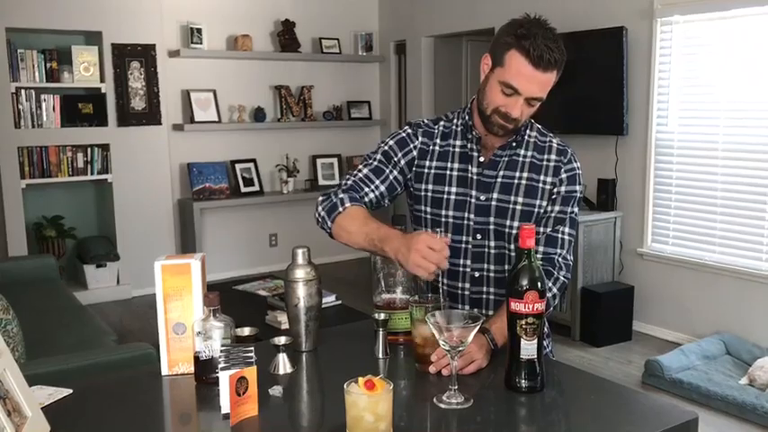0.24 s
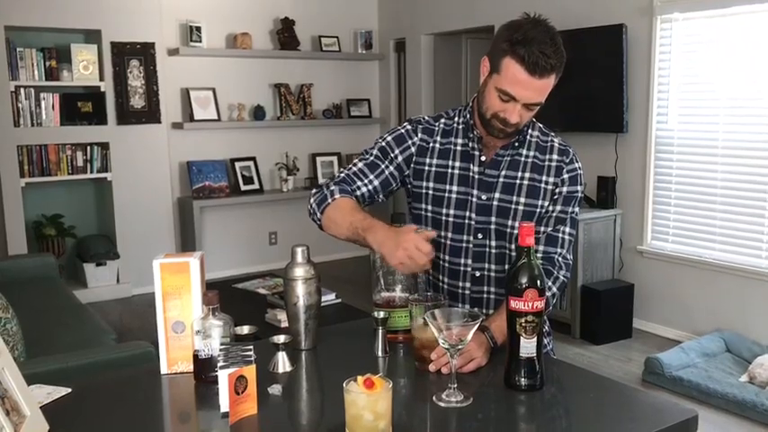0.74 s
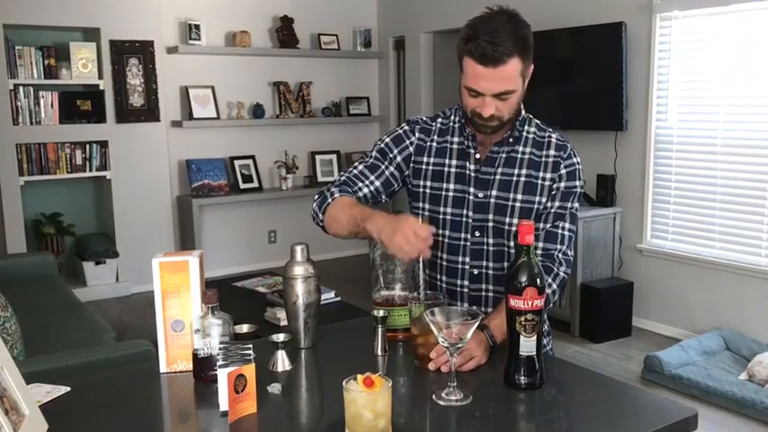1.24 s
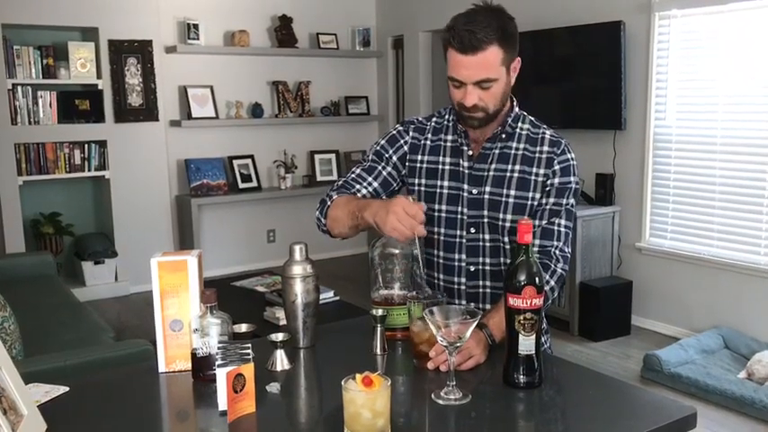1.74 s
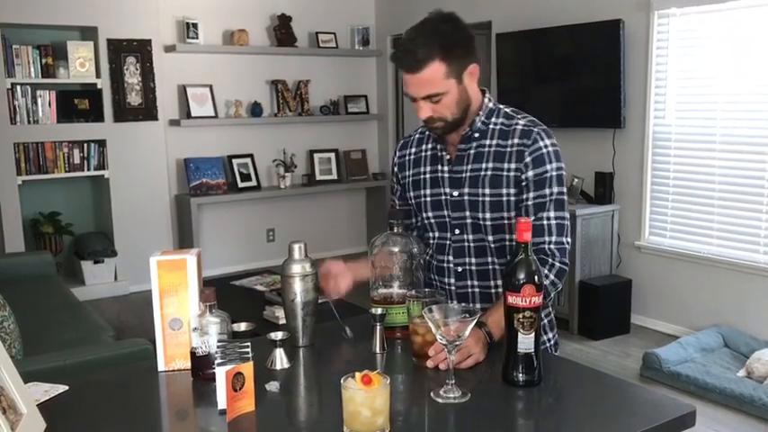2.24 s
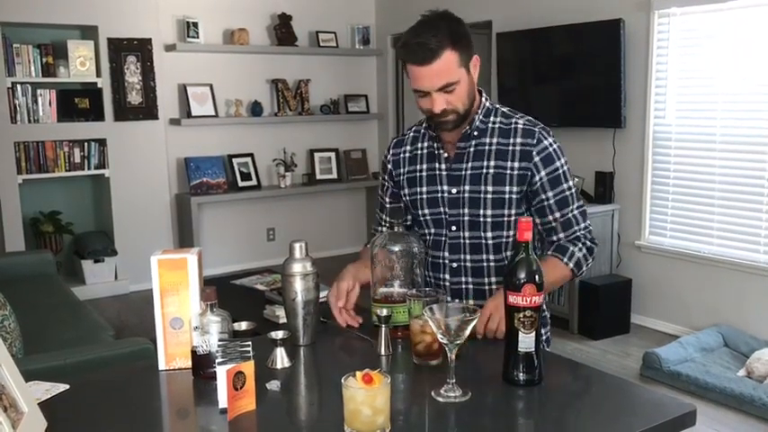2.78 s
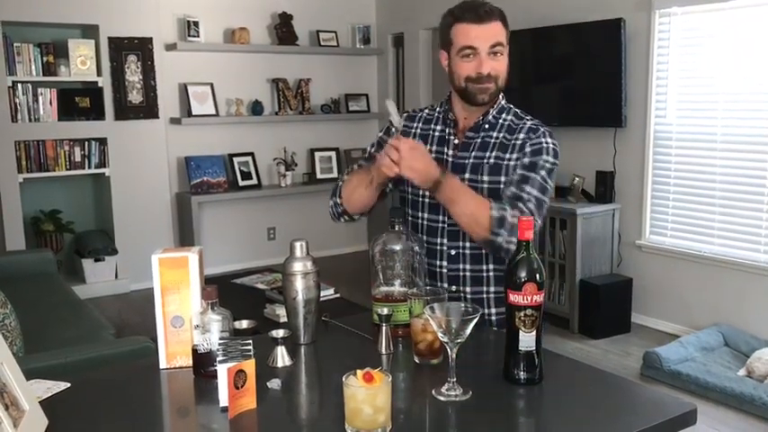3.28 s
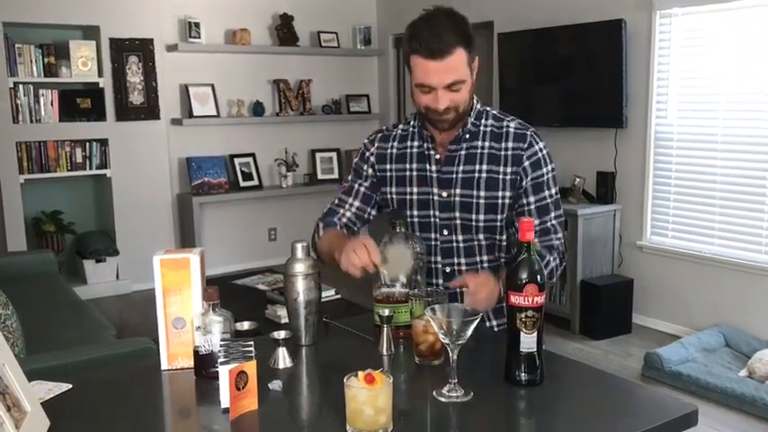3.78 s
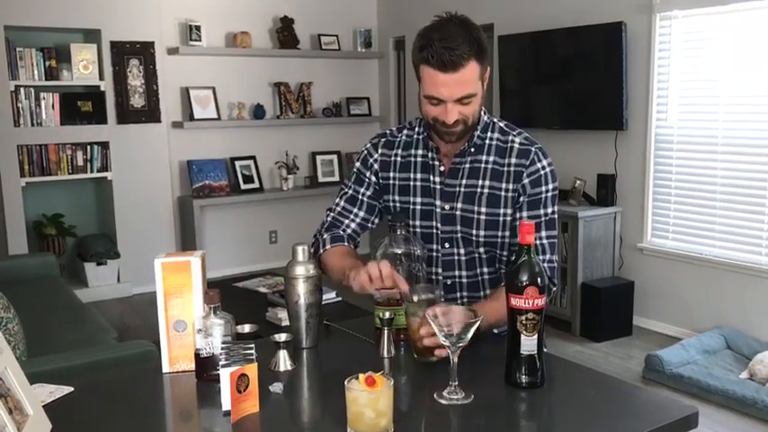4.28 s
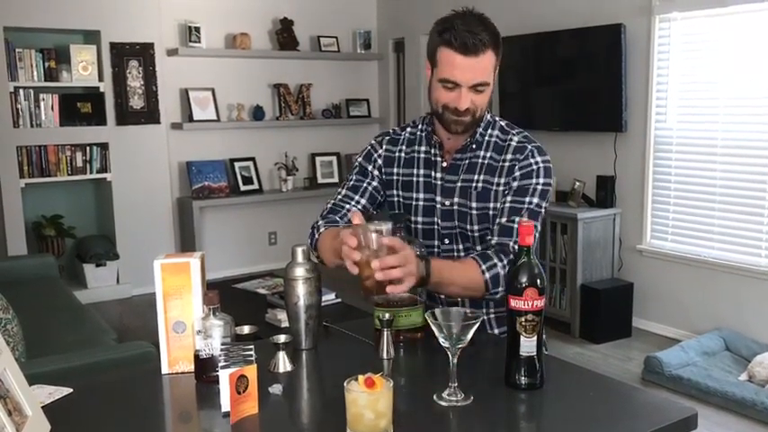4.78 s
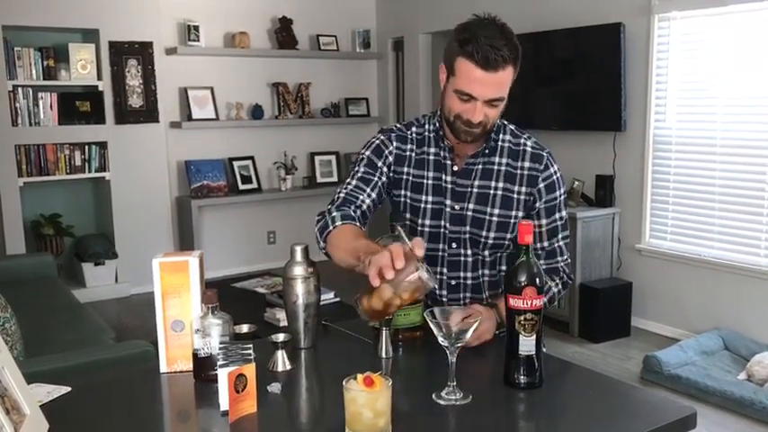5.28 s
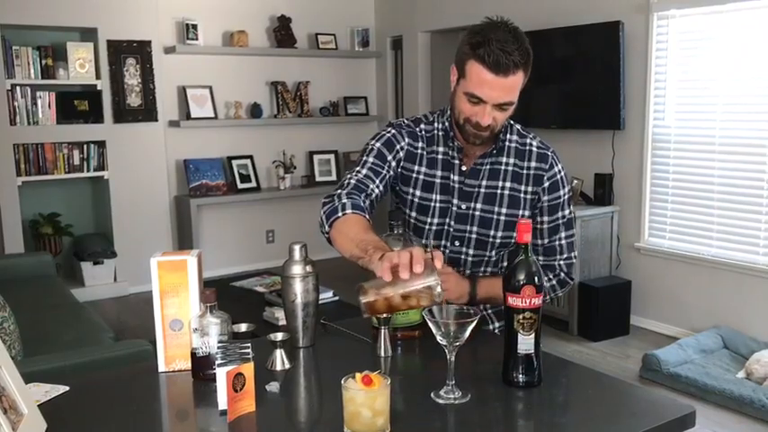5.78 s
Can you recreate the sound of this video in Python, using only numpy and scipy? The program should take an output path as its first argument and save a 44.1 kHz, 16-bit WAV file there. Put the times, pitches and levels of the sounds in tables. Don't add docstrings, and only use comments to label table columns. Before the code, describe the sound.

A metal bar spoon stirs ice in a wet mixing glass with dense, uneven clinks, then taps the rim with one loud ring. The spoon drops on a stone counter, ringing and bouncing to rest. After a pause, a thin metal strainer is lifted, then rattles onto the glass. Ice knocks faintly as it tips, and a soft pour starts. Lively living room, low ventilation hum, one microphone.

```python
import sys
import numpy as np
from scipy import signal
from scipy.fft import rfft, irfft
from scipy.io import wavfile
from scipy.ndimage import uniform_filter1d

SR = 44100
rng = np.random.default_rng(int(sys.argv[2]) if len(sys.argv) > 2 else 0)


def convert_level_to_amplitude(level_db):
    exponent = np.asarray(level_db, float) / 20
    return 10 ** exponent


def file_out(sig):
    cols = np.atleast_2d(sig).T
    lim = np.clip(cols, -1, 1)
    pcm = np.round(lim * 32767).astype(np.int16)
    wavfile.write(sys.argv[1], SR, pcm)


N = 265482
TIME_S = np.arange(N) / SR


def stirring():
    # start_s, strength_db, hardness_db_per_octave
    stir_blows = [(0.003, -25.5, 6.5), (0.0131, -30, 0.5), (0.1606, -52.5, -6.5), (0.2458, -37.5, 0),
                  (0.2563, -46, 5), (0.2902, -59, 2), (0.3066, -35, 2.5), (0.388, -40.5, -1.5),
                  (0.4685, -47, -6), (0.5092, -39, -0.5), (0.5706, -45.5, 4), (0.5748, -38.5, -3.5),
                  (0.5892, -44, -3), (0.604, -48.5, -7.5), (0.6545, -44.5, 0.5), (0.6585, -23.5, 2),
                  (0.664, -39.5, 1), (0.6715, -25, 0.5), (0.6785, -45.5, -2.5), (0.693, -34.5, -3),
                  (0.7038, -38, 5), (0.8106, -34.5, -0.5), (0.8529, -45.5, -1), (0.8794, -34.5, -1.5),
                  (0.9497, -46, 10), (1.0071, -39.5, 1), (1.0112, -31, 2.5), (1.0287, -37.5, -4),
                  (1.0548, -35.5, -1), (1.061, -40, 1.5), (1.1095, -44, 1), (1.1558, -44, 1),
                  (1.2369, -40, -4), (1.256, -52, -2.5), (1.3153, -46, -5.5), (1.3594, -45.5, -4)]
    # pitch_hz, level_db, t60_s
    stirred_modes = [(290, -21.5, 0.098), (616, -32, 0.032), (1141, -10.5, 0.035), (1850, -12, 0.079),
                     (3090, 0.5, 0.012), (4412, -3, 0.075), (4323, -5, 0.055), (2450, -8.5, 0.033),
                     (5200, -14, 0.012), (6250, -4.5, 0.053), (8400, -13.5, 0.073), (12150, -16, .06)]
    # start_s, level_db
    stem_pings = [
        (0.0134, -46),
        (0.3072, -49.5),
        (0.7043, -56),
        (0.8794, -39.5),
        (1.064, -42),
        (1.1587, -50.5),
        (1.291, -63),
    ]
    # start_s, level_db
    wall_pings = [(0.0044, -27.5), (0.164, -37.5), (0.3074, -38), (0.396, -34.5), (0.5103, -49),
                  (0.606, -42), (0.7032, -52.5), (0.8121, -36.5), (0.8822, -41.5), (0.9503, -42.5),
                  (1.0114, -37), (1.1078, -37), (1.2365, -52), (1.3613, -56), (1.4152, -57)]
    # start_s, contacts_per_s, level_db
    swirl = [
        (0.0, 76, -41.5),
        (0.32, 51, -50),
        (0.6, 270, -54),
        (0.784, 103, -49),
        (0.972, 270, -50),
        (1.336, 160, -61.5),
        (1.5, 170, -67),
    ]
    out = blows(stir_blows, "stirred", stirred_modes, damp=0.54, ring_db=-24,
                crack_db=-7.5, crack_s=0.0036, spread_db=2)
    out += pings(stem_pings, 6390, level_db=7, t60=0.067)
    out += pings(wall_pings, 1838, level_db=-1, t60=0.06)
    return out + convert_level_to_amplitude(-9) * ice(swirl, stirred_modes, damp=0.56, tick_db=3, uneven_db=4)


def rim_tap():
    # start_s, strength_db, hardness_db_per_octave
    tap = [
        (1.5085, -12, 0.23),
    ]
    glass_hz = (275, 520, 660, 870, 1180, 1832, 1847, 4180, 4441, 4515, 4690, 6390, 7797, 7845, 7932, 12130,
                12190, 14840)
    # level_db, t60_s
    glass_modes = [(-40.5, 0.32), (-28.5, 0.035), (-26.5, 0.015), (-35, 0.055), (-17.5, .02), (-22.5, 0.1),
                   (-21, 0.2), (-20.5, 0.09), (-13.5, 0.22), (-5.5, 0.025), (-24.5, .02), (-29.5, 0.18),
                   (-19.5, 0.054), (-23.5, 0.22), (-19, 0.12), (-25.5, 0.1), (-28, 0.05), (-27, .1)]
    return blows(tap, "rim", np.c_[glass_hz, glass_modes], damp=0.69, ring_db=-2.5,
                 crack_db=-13, crack_s=0.0055, spread_db=1)


def spoon_held():
    # start_s, strength_db, hardness_db_per_octave
    touches = [
        (2.367, -33.5, 0.09),
        (2.4324, -38, 0.79),
    ]
    held_hz = (1300, 2250, 6390, 6780, 8960, 10640, 12950, 14890)
    # level_db, t60_s
    held_modes = [(-1.5, 0.014), (-6.5, 0.092), (-6.5, 0.27), (-21.5, .05), (-6.5, .04), (-3.5, 0.051),
                  (-1.5, .04), (2, .1)]
    return blows(touches, "held", np.c_[held_hz, held_modes], damp=0.33, ring_db=-26.5,
                 crack_db=-8.5, crack_s=0.022, spread_db=2)


def spoon_rocking():
    # start_s, strength_db, hardness_db_per_octave
    bowl_blows = [
        (2.5352, -16.5, 1),
        (2.5395, -27, 0),
        (2.544, -26.5, -1),
        (2.5744, -26.5, -0.5),
        (2.6748, -29.5, -2.5),
        (2.7472, -27.5, 0.5),
    ]
    rocking_hz = (275, 520, 610, 700, 2234, 4960, 6390, 7714, 7790, 8880, 10820, 11360, 12190, 14400, 15060,
                  15480)
    # level_db, t60_s
    rocking_modes = [(-12, 0.29), (-16.5, 0.015), (7, 0.048), (-18, 0.42), (-6, 0.982), (-2.5, 2.0),
                     (2, 0.66), (-1, 0.18), (-0.5, 1.2), (9, 0.029), (-19, 0.24), (-2, 0.3), (-15.5, 0.16),
                     (-12, .15), (3, .3), (-11, 0.18)]
    caught_s, caught_t60_s = 2.768, 0.03
    caught = convert_level_to_amplitude(-60 * np.clip(TIME_S - caught_s, 0, 1) / caught_t60_s)
    return caught * blows(bowl_blows, "rocking", np.c_[rocking_hz, rocking_modes], damp=0.32,
                          ring_db=-26.5, crack_db=-7.5, crack_s=0.0008, spread_db=2)


def spoon_free():
    # start_s, strength_db, hardness_db_per_octave
    stem_blows = [
        (2.7652, -19, -0.32),
        (2.7705, -25, 0.76),
        (2.776, -31, -1),
        (2.8425, -23, -0.16),
        (2.847, -28, -1.7),
        (2.8948, -25.5, -1.7),
        (2.9344, -27, -1.96),
    ]
    free_hz = (275, 600, 6390, 6800, 8400, 9040, 10610, 11370, 11820, 12190, 13000, 13580, 13785, 14370,
               15040)
    # level_db, t60_s
    free_modes = [(-20, 0.14), (-25.5, 0.05), (-1, 0.09), (-9, 0.081), (-3.5, 0.09), (-23, 0.23),
                  (-5, 0.053), (-22, 0.092), (-19, 0.44), (-7.5, 0.12), (-17, 0.22), (-5, 0.27),
                  (-21.5, .25), (-19, .1), (-29, .2)]
    return blows(stem_blows, "free", np.c_[free_hz, free_modes], damp=1, ring_db=-21.5,
                 crack_db=-9.5, crack_s=0.0095, spread_db=1)


def strainer_lift():
    # start_s, strength_db, hardness_db_per_octave
    lift_blows = [
        (3.3375, -40.5, 0.75),
        (3.597, -63.5, 2.2),
        (3.604, -79, 1.7),
        (3.6496, -67, 2.5),
    ]
    strainer_hz = (4425, 5860, 5930, 7644, 9685, 14920)
    # level_db, t60_s
    strainer_modes = [(-5, 0.078), (-14, 0.1), (1.5, 0.065), (-2.5, 0.042), (2, 0.053), (5, .04)]
    return blows(lift_blows, "strainer", np.c_[strainer_hz, strainer_modes], damp=0.52, ring_db=-43.5,
                 crack_db=-15.5, crack_s=0.043, spread_db=0)


def strainer_seat():
    # start_s, strength_db, hardness_db_per_octave
    brushes = [
        (3.956, -54, 0.1),
        (3.9994, -77, -0.9),
        (4.0905, -73.5, -0.078),
        (4.1032, -64, -0.65),
    ]
    # start_s, strength_db, hardness_db_per_octave
    seat_blows = [(4.1408, -59, 7), (4.146, -58, 8), (4.1505, -43.5, 4), (4.1545, -43, -0.5),
                  (4.1594, -46, 7), (4.165, -42.5, -0.5), (4.171, -52, -2), (4.177, -52, 7.5),
                  (4.182, -39.5, -1), (4.188, -60, 6), (4.1944, -45, -8), (4.2, -47.5, -7),
                  (4.2383, -46.5, -5.5), (4.2642, -33.5, 0), (4.268, -39, -2), (4.3744, -62, 4)]
    # pitch_hz, level_db, t60_s
    capped_modes = [(165, -17.5, 0.32), (268, -5, 0.165), (540.4, -6, 0.17), (599, -7, 0.28),
                    (1045, 7, 0.015), (1200, -14, 0.03), (1825, -6.5, 0.047), (2880, 5, 0.012),
                    (4390, -2, 0.049), (4523, 4.5, 0.031), (6180, 4, 0.023), (7800, 1, 0.026),
                    (8000, 5.5, 0.029), (11930, 0, 0.033)]
    out = blows(seat_blows, "seated", capped_modes, damp=0.59, ring_db=-31.5,
                crack_db=-6, crack_s=0.0042, spread_db=2)
    return out + blows(brushes, "brushed", capped_modes, damp=1, ring_db=-66,
                       crack_db=-16, crack_s=0.023, spread_db=0)


def ice_shift():
    # start_s, tick_db, low_hz, low_db, wall_db
    shift_knocks = [(4.6658, -47, 1840, -51.5, -65), (4.6994, -56, 2110, -56, -65),
                    (4.7396, -54, 1850, -66, -50), (4.772, -52, 1890, -55, -65),
                    (4.8065, -48.5, 2860, -69, -55), (4.896, -55, 2880, -50, -47),
                    (4.9396, -67, 2760, -66, -59), (4.977, -64, 2860, -63, -61),
                    (5.0092, -69, 3520, -65, -57), (5.0352, -68, 2030, -63, -55),
                    (5.0494, -61, 2260, -68, -69), (5.0657, -54.5, 2260, -54, -63),
                    (5.143, -64, 1780, -62, -66), (5.1676, -66, 2560, -58, -55),
                    (5.2148, -73, 2500, -61, -72), (5.2285, -72, 2500, -56, -66),
                    (5.2765, -64, 2400, -64, -69), (5.2924, -64, 2420, -59, -59),
                    (5.308, -57, 2550, -68, -61), (5.3386, -65, 2400, -57, -56),
                    (5.3666, -56, 2450, -58, -60), (5.4544, -56, 2250, -64, -74),
                    (5.503, -59.5, 2440, -68, -64.5), (5.5376, -52.5, 3390, -65, -59),
                    (5.5767, -58, 3300, -67, -60), (5.6763, -60, 2590, -73.5, -70),
                    (5.691, -54, 2650, -76.5, -70), (5.715, -66, 2850, -75, -56)]
    wall_start_hz, wall_rise_hz_per_s, wall_scatter_hz = 4395, 190, 130
    tick_gain_db, ring_gain_db, ring_t60_s, tick_s = -4.5, 5, 0.016, 0.0023
    out, t = np.zeros(N), np.arange(SR // 5) / SR
    grit = rms_one(band(rng.standard_normal(N), 3100, 8000))
    envelope = convert_level_to_amplitude(ring_gain_db - 60 * t / ring_t60_s) * (1 - np.exp(-t / 0.00023))
    for s, tick_db, low_hz, low_db, wall_db in shift_knocks:
        wall_hz = wall_start_hz + wall_rise_hz_per_s * (s - shift_knocks[0][0])
        wall_hz += wall_scatter_hz * rng.standard_normal()
        i = int(s * SR)
        rings = convert_level_to_amplitude(low_db) * np.sin(2 * np.pi * low_hz * t)
        rings += convert_level_to_amplitude(wall_db) * np.sin(2 * np.pi * wall_hz * t)
        out[i:i + len(t)] += envelope * rings
        out[i:i + len(t)] += convert_level_to_amplitude(tick_db + tick_gain_db) * np.exp(-t / tick_s) * grit[i:i + len(t)]
    return out


def slosh():
    # start_s, contacts_per_s, level_db
    slosh_curve = [
        (4.6, 60, -74.5),
        (4.726, 60, -61.5),
        (4.878, 60, -66.5),
        (5.366, 61, -72),
        (5.612, 57.9, -73.5),
        (5.816, 58.4, -71),
        (5.9, 60, -64),
    ]
    # pitch_hz, level_db, t60_s
    tilted_modes = [(1840, -17.5, 0.046), (2390, 2, 0.033), (2850, 0, 0.033), (4260, -0.5, 0.019),
                    (4450, -3, 0.042), (4640, -18, 0.0298), (6130, -4, 0.027), (7170, -17, 0.033)]
    return convert_level_to_amplitude(-6) * ice(slosh_curve, tilted_modes, damp=0.42, tick_db=-0.5, uneven_db=1.5)


def single_rings():
    # start_s, level_db, pitch_hz, t60_s
    single_knocks = [(0.0135, -37, 6250, 0.03), (0.2484, -44, 2960, 0.066), (0.471, -47, 1035, 0.067),
                     (0.5777, -42, 1103, 0.048), (0.5898, -31, 4420, .04), (0.6595, -30, 2800, 0.04),
                     (0.671, -44, 4430, .03), (0.693, -39.5, 2950, .03), (0.7045, -56, 12150, .07),
                     (3.955, -60.5, 4450, .4), (4.158, -45, 5860, .1), (4.17, -36, 4450, .1),
                     (4.667, -55, 7930, 0.071), (5.066, -60, 7000, .03), (5.3, -61, 6440, .04),
                     (5.716, -65, 4770, .15), (4.668, -57, 4430, .1), (4.885, -52, 4400, .03),
                     (3.342, -61, 5890, .3), (1.06, -42, 3014, 0.036), (2.367, -48.5, 276, 0.14),
                     (2.368, -31, 1380, .015), (2.433, -47, 2300, .03), (0.003, -27.5, 8000, .04),
                     (2.767, -39, 276, 0.13), (3.342, -53, 4400, 0.11), (4.146, -44.5, 1125, 0.24),
                     (4.895, -47.5, 4260, 0.033), (4.69, -62, 943, 0.096), (5.55, -61, 3430, .12)]
    return sum(pings([(s, db)], hz, 0, t60) for s, db, hz, t60 in single_knocks)


def pour():
    # start_s, level_db
    run = [
        (5.75, -67),
        (5.886, -68.5),
        (5.94, -59),
        (6.02, -63),
    ]
    # frequency_hz, db_per_hz
    run_colour = [(350, -29), (600, -11), (649, -6), (868, -8), (1820, 0.5), (2390, -3.5), (4390, -1.5),
                  (14000, -20.5)]
    swell = np.clip((TIME_S - run[0][0]) / 0.13, 0, 1)
    return convert_level_to_amplitude(in_time(run, 1) + 2.5) * coloured(run_colour) * swell


def blows(table, body, modes, damp, ring_db, crack_db, crack_s, spread_db):
    bands_hz = (400, 1400, 2700, 5500, 7000, 19000)
    colour_db = {"stirred": (-12, -6.5, 0, -1, -6), "rim": (-8, -7, -2, -5.5, -11),
                 "held": (-8, -1, 2, -4.5, 5.5), "rocking": (-7.5, -2, 2, -17.5, 4.5),
                 "free": (-12, -5, -2.5, -7, -4), "strainer": (-14, -9, 1, 0, 6.5),
                 "seated": (-2, -4.5, -1, -7, 6), "brushed": (2.1, 3.9, 10.4, 13.4, 22.3)}
    band_octave = np.log2(np.sqrt(np.multiply(bands_hz[1:], bands_hz[:-1])) / 3850)
    rows = np.array(table, float)
    start = int(rows[0, 0] * SR)
    size = min(N - start, int((rows[-1, 0] - rows[0, 0] + 1) * SR))
    at = ((rows[:, 0] + 0.0009) * SR).astype(int) - start
    strength_db = rows[:, [1]] + colour_db[body] + rows[:, [2]] * band_octave
    share_db = strength_db - strength_db.max(axis=0)
    home = np.clip(np.searchsorted(bands_hz, np.array(modes)[:, 0]) - 1, 0, 4)
    luck_db = rng.normal(0, 1, (len(at), len(modes))) * spread_db
    part = np.zeros(size)
    for k, (hz, level_db, t60) in enumerate(modes):
        clicks = np.zeros(size)
        clicks[at] = convert_level_to_amplitude(ring_db + level_db + share_db[:, home[k]] + luck_db[:, k])
        part += struck(clicks, hz, np.clip(t60 * damp, 0.01, 1.5), rise_s=0.00038)
    grit = rng.standard_normal(size)
    for k, (low, high) in enumerate(zip(bands_hz, bands_hz[1:])):
        clicks = np.zeros(size)
        clicks[at] = convert_level_to_amplitude(strength_db[:, k] + crack_db)
        fade = np.exp(-1 / (SR * (crack_s + 3.1 / low)))
        envelope = uniform_filter1d(signal.lfilter([1], [1, -fade], clicks), size=31, origin=15)
        part += rms_one(band(band(grit, low, high), low, high)) * envelope
    out = np.zeros(N)
    out[start:start + size] = part
    return out


def ice(curve, modes, damp, tick_db, uneven_db):
    active = (TIME_S > curve[0][0]) & (TIME_S < curve[-1][0])
    born = (rng.random(N) < in_time(curve, 1) / SR) * active
    clicks = born * convert_level_to_amplitude(uneven_db * np.minimum(rng.exponential(1, N), 3)) * rng.choice([-1, 1], N)
    dealt = rng.random((3, N)) < 0.5
    glass = np.zeros(N)
    for k, (hz, db, t60) in enumerate(modes):
        glass += convert_level_to_amplitude(db) * ring(clicks * dealt[k % 3], hz, np.clip(t60 * damp, 0.01, 0.5))
    wet = rng.standard_normal(N) * signal.lfilter([1], [1, -np.exp(-1 / (SR * 0.0062))], abs(clicks))
    ticks = band(band(wet, 600, 6600), 500, 12000)
    mix = glass / np.std(glass[active]) + convert_level_to_amplitude(tick_db) * ticks / np.std(ticks[active])
    return convert_level_to_amplitude(in_time(curve, 2)) * mix


def pings(table, hz, level_db, t60):
    clicks = np.zeros(N)
    for s, db in table:
        clicks[int(s * SR)] = convert_level_to_amplitude(db + level_db)
    return struck(clicks, hz, t60, rise_s=0.00035)


def struck(clicks, hz, t60, rise_s):
    return ring(clicks, hz, t60) - ring(clicks, hz, min(rise_s * np.log(1000), t60 / 2))


def ring(clicks, hz, t60):
    r, w = convert_level_to_amplitude(-60 / (t60 * SR)), 2 * np.pi * hz / SR
    return signal.lfilter([0, np.sin(w)], [1, -2 * r * np.cos(w), r * r], clicks + 1e-18)


def coloured(spectrum):
    hz = np.arange(N // 2 + 1) * SR / N + 1
    return rms_one(irfft(rfft(rng.standard_normal(N)) * convert_level_to_amplitude(at_hz(spectrum, hz)), N))


def band(x, low_hz, high_hz):
    return signal.sosfilt(signal.butter(2, [low_hz, high_hz], "band", fs=SR, output="sos"), x)


def rms_one(x):
    return x / np.sqrt(np.mean(x ** 2) + 1e-20)


def in_time(rows, column):
    rows = np.array(rows)
    return np.interp(TIME_S, rows[:, 0], rows[:, column])


def at_hz(points, hz):
    points = np.array(points)
    return np.interp(np.log(hz), np.log(points[:, 0]), points[:, 1])


def near_echoes(x):
    # delay_s, level_db
    early_echo = [
        (0.0031, -13),
        (0.0058, -15),
        (0.0087, -17),
    ]
    out = x.copy()
    for k, (s, db) in enumerate(early_echo):
        out += convert_level_to_amplitude(db) * np.r_[np.zeros(int(s * SR)), x][:N] * (-1) ** k
    return out


def room(x, build_s):
    # frequency_hz, t60_s
    room_t60 = [(200, 0.6), (1000, 0.73), (3000, 0.72), (6000, 0.54), (10000, 0.48), (16000, 0.03)]
    t = np.arange(SR) / SR
    limits_hz = 150 * 2 ** np.arange(0, 7.1, 0.5)
    white = rng.standard_normal((2, SR))
    tail = np.zeros(SR)
    for k, (low, high) in enumerate(zip(limits_hz, limits_hz[1:])):
        tail += band(white[k % 2], low, high) * convert_level_to_amplitude(-60 * t / at_hz(room_t60, np.sqrt(low * high)))
    tail *= 1 - np.exp(-t / build_s)
    return signal.fftconvolve(x, tail / np.sqrt(np.sum(tail ** 2)))[:N]


def air():
    # frequency_hz, db_per_hz
    hush_colour = [(65, -36), (110, -6), (174, -5), (233, -14.5), (332, -3.5), (376, -5), (426, -18),
                   (473, -9), (813, -18.5), (6400, -31.5), (10300, -36), (15000, -33.5), (16000, -45)]
    # pitch_hz, width_hz, level_db
    hums = [(35.8, 6.2, -71.5), (57, 8, -69.5), (80.4, 1.9, -66.5), (241.4, 14, -70), (376.4, 5, -67.5),
            (114, 11, -74), (420, 12, -85), (11500, 40, -98)]
    motor_hz, motor_db = 78.2, -62.5
    out = convert_level_to_amplitude(-65.5) * coloured(hush_colour) + convert_level_to_amplitude(motor_db) * np.sin(2 * np.pi * motor_hz * TIME_S)
    for hz, width_hz, db in hums:
        out += convert_level_to_amplitude(db) * rms_one(ring(rng.standard_normal(N), hz, np.log(1000) / (np.pi * width_hz)))
    return out


def scene():
    dry = stirring() + rim_tap()
    dry += spoon_held() + spoon_rocking() + spoon_free()
    dry += strainer_lift() + strainer_seat()
    dry += ice_shift() + slosh() + single_rings()
    dry = signal.sosfilt(signal.butter(2, 190, "high", fs=SR, output="sos"), dry)
    mono = convert_level_to_amplitude(-0.37) * near_echoes(dry) + convert_level_to_amplitude(-3.5) * room(dry, build_s=0.0016)
    mono += pour() + air()
    return np.stack([mono, mono])


def band_limit(x):
    return signal.sosfilt(signal.butter(12, 16790, fs=SR, output="sos"), x)


def record(dry):
    # start_s, end_s
    hiss_spans = [
        (1.51, 1.925),
        (2.37, 3.26),
        (4.15, 4.565),
    ]
    gate = sum((TIME_S > a) & (TIME_S < b) for a, b in hiss_spans)
    hiss = convert_level_to_amplitude(-67) * band(rng.standard_normal(N), 700, 19000) * gate
    x = signal.sosfilt(signal.cheby2(12, 45, 16350, fs=SR, output="sos"), dry + hiss)
    x = signal.sosfilt(signal.butter(6, 30, "high", fs=SR, output="sos"), x)
    return band_limit(x)


dry = scene()
out = record(dry)
file_out(out)
```